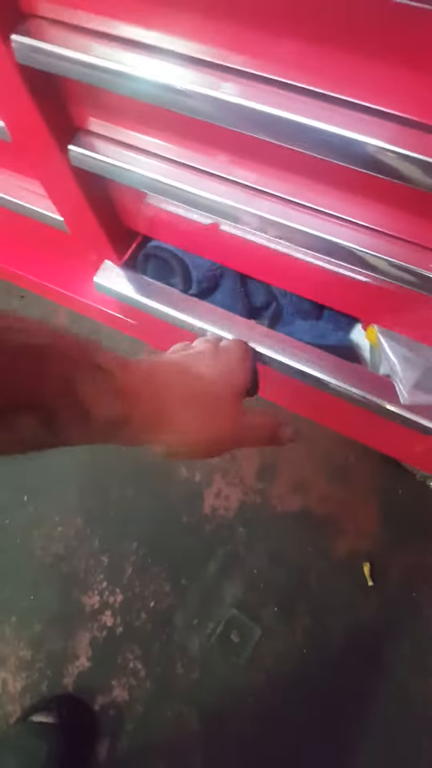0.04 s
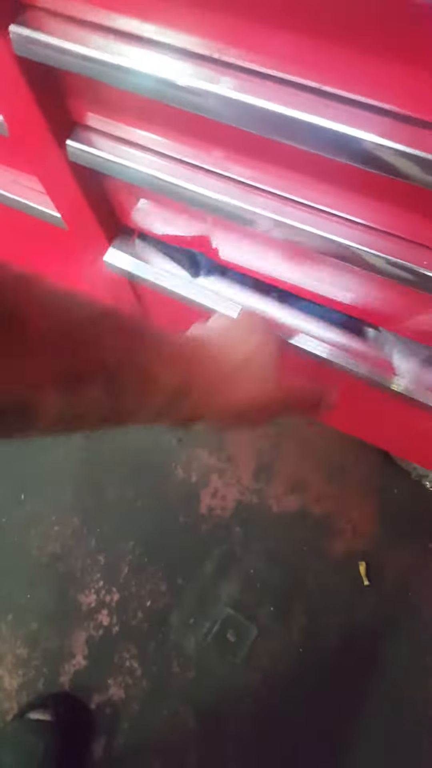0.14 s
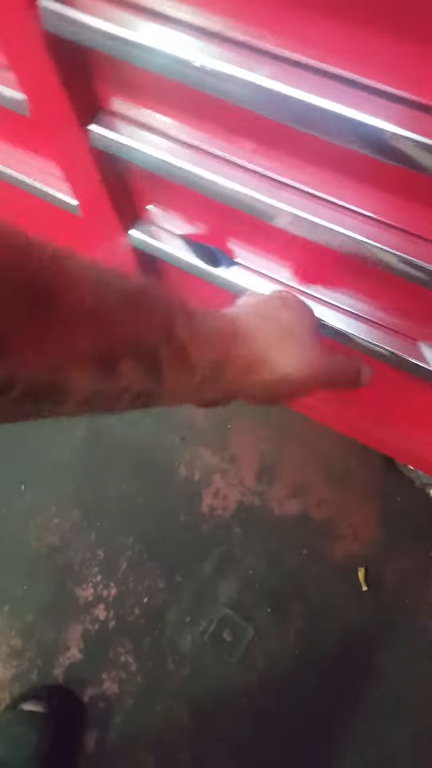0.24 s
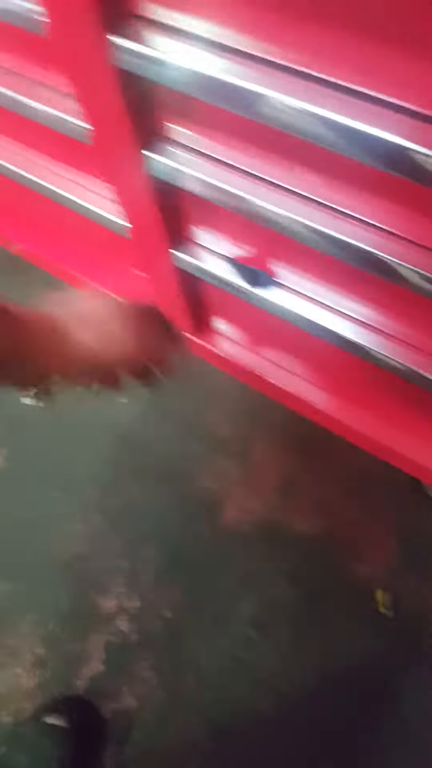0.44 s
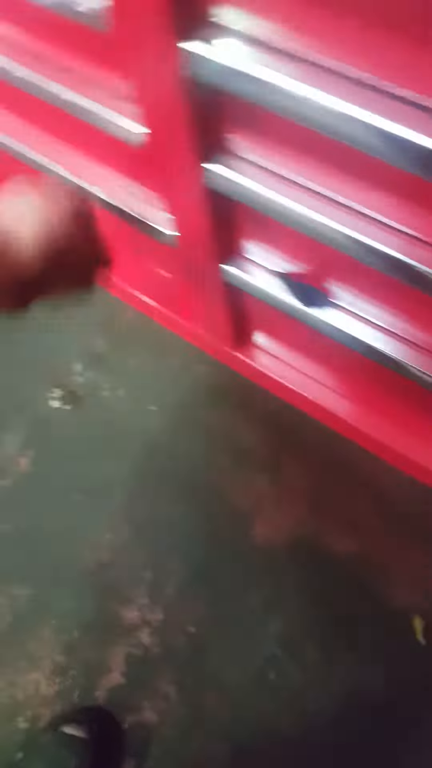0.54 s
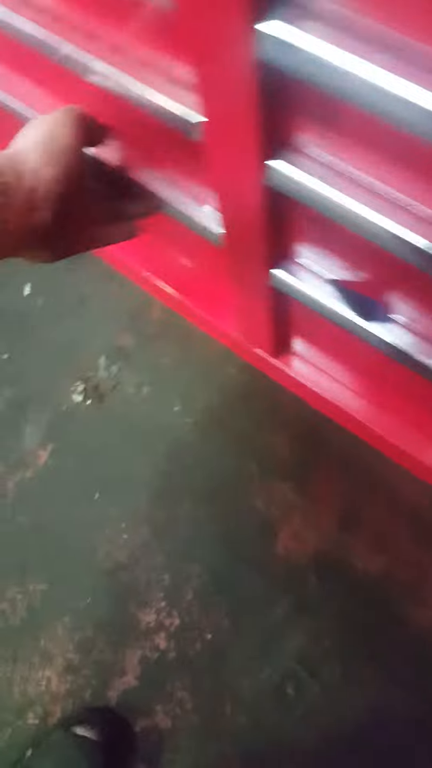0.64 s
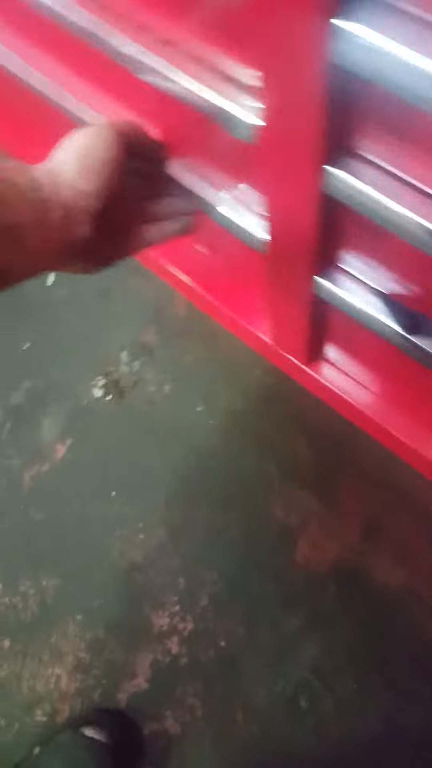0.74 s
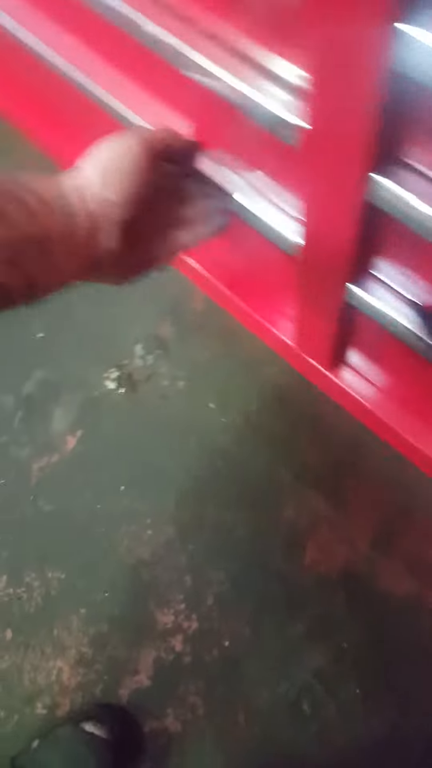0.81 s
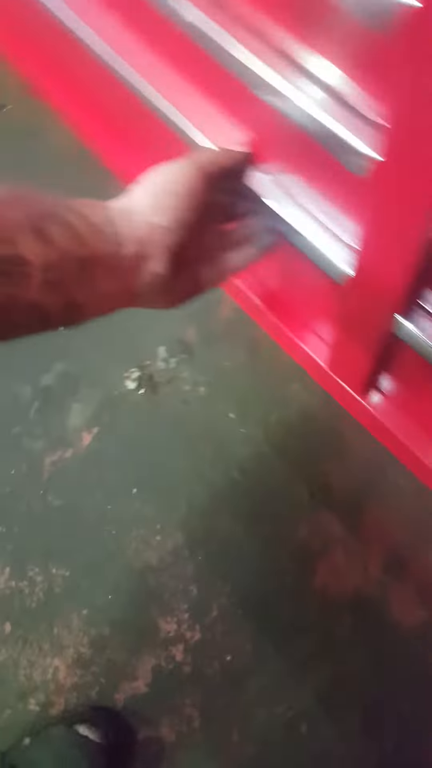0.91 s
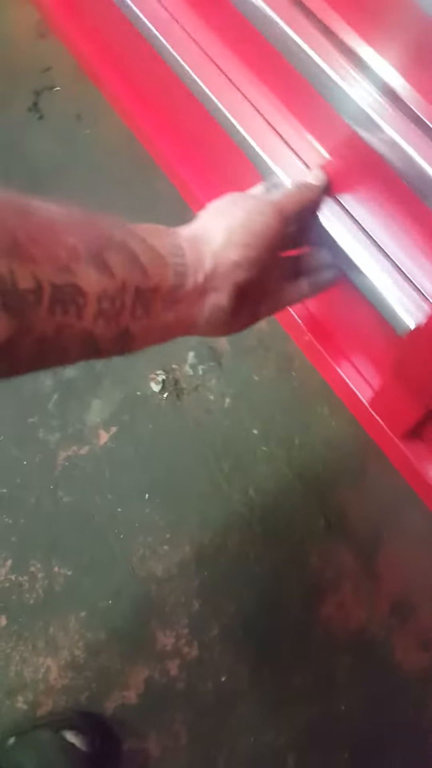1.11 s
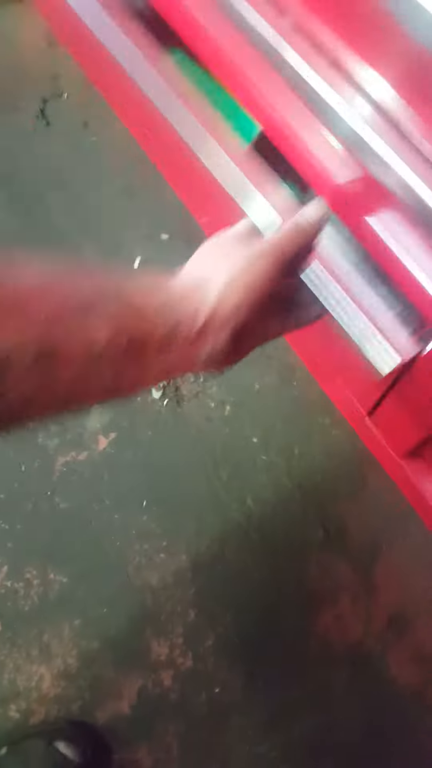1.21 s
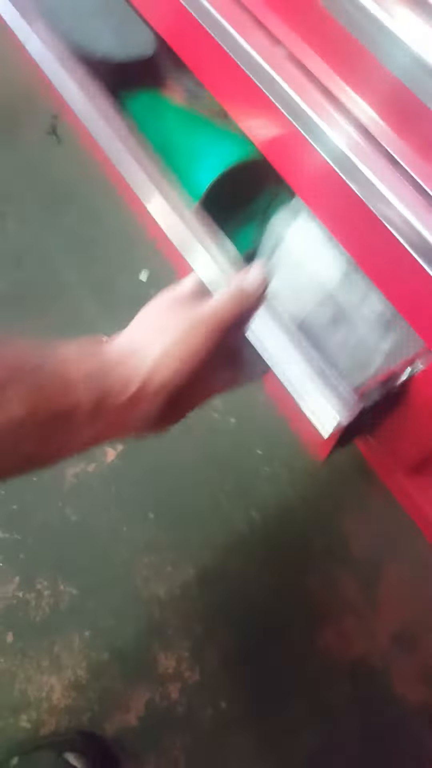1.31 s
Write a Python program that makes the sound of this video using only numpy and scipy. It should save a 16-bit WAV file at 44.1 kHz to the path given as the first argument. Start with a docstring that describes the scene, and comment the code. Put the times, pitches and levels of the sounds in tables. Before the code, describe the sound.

A steel tool-chest drawer slams shut with a boom, then another unlatches and rolls open

```python
"""Tool-chest drawer slammed in a garage

A hand shoves a steel drawer shut: it rolls, passes its catch and slams; the panels boom into the garage.
Then fingers grip the next handle, the drawer breaks free, rolls and clicks, over a low room hum.
Grains and knocks of force drive dense steel bursts and panel modes; ping, click and push are added sines.
Filtered noise makes echo and hum; two microphone ports hear the chest at different level and phase."""
import sys
import numpy as np
from scipy import signal
from scipy.fft import rfft, irfft
from scipy.io import wavfile
from scipy.ndimage import uniform_filter1d

SR = 44100
rng = np.random.default_rng(int(sys.argv[2]) if len(sys.argv) > 2 else 0)


def unload_wav(signal):
    """Save mono or channel-first audio to the path in sys.argv[1] as 16-bit WAV at rate SR, clipped to [-1, 1]."""
    wavfile.write(
        sys.argv[1],
        SR,
        np.round(np.clip(np.atleast_2d(signal).T, -1, 1) * 32767).astype(np.int16),
    )


def amplitude_ratio(level_db):
    """Convert a level in decibels to the matching linear amplitude (field) ratio."""
    exponent = np.asarray(level_db, float) / 20
    return 10 ** exponent


N = 59535
T = np.arange(N) / SR
OPPOSITE = np.array([[1], [-1]])  # signs of the side signal at left and right


def table(rows, hz):
    """Read (frequency [Hz], value) points on a log-frequency axis."""
    rows = np.array(rows, float)
    return np.interp(np.log(np.maximum(hz, 1)), np.log(np.maximum(rows[:, 0], 1)), rows[:, 1])


def unit(x):
    """Scale to unit energy."""
    return x / np.sqrt(np.sum(x ** 2))


def fade(t60_s, t_s):
    """Exponential decay, 60 dB down after t60_s."""
    return np.exp(-np.log(1000) * t_s / t60_s)


def highpass(x, order, cutoff_hz):
    """Butterworth high-pass."""
    return signal.sosfilt(signal.butter(order, cutoff_hz, "high", fs=SR, output="sos"), x)


def ring(modes, size=16384):
    """Sum of decaying sines; modes: (frequency [Hz], level [dB], T60 [s])."""
    t = T[:size]
    return sum(amplitude_ratio(db) * np.sin(2 * np.pi * hz * t) * fade(t60_s, t) for hz, db, t60_s in modes)


def bands():
    """Half-octave-spaced bands of two noises: centre [Hz], mid, side."""
    hz = np.fft.rfftfreq(N, 1 / SR)
    spectra = rfft(rng.standard_normal((2, N)))
    for centre_hz in 22 * 2 ** np.arange(0, 10, 0.5):
        octaves = np.log2(np.maximum(hz, 1) / centre_hz)
        window = np.cos(np.pi * np.clip(octaves, -0.5, 0.5)) ** 2
        mid, side = irfft(spectra * window, N)
        yield centre_hz, mid, side


def pair(hz, mid, side):
    """Mix left and right so that they correlate as a diffuse room field does."""
    # (frequency [Hz], left-right correlation)
    likeness = [(60, 0.94), (250, 0.97), (700, 0.37), (1500, 0.08), (12000, 0.026)]
    c = np.clip(table(likeness, hz), 0, 1)
    return np.sqrt(1 + c) * mid + np.sqrt(1 - c) * side * OPPOSITE


def rolling():
    """Rolling and rubbing on the runners: sparse random bearing grains into body, boom, clang and tick."""
    # each: (time [s], body level [dB], boom, clang, tick [dB re body])
    shut = [(0.0, -48, -3, -6, -16), (0.042, -51, 8, -31, -40), (0.072, -53, -1, -6.5, -16.5),
            (0.19, -36.5, 2.5, -12.5, -20.5), (0.2, -49.5, 7, 13, -6), (0.226, -8.5, -21, -11.5, -25.5),
            (0.256, -19, 11, -8.5, -37), (0.31, -32, 10.5, -34, -54)]
    grip = [(0.64, -77, 1, -11, -23), (0.7, -61, 9, 6.5, -13), (0.764, -53.5, -4, -24, -24),
            (0.858, -64, 12.5, 1, -12), (0.895, -52.5, -11, -3.5, -29), (0.926, -37.5, 4.5, -5, -46),
            (0.963, -45.5, -11.5, -43, -22), (0.996, -48.5, 15, -36, -44), (1.08, -67, 15, -23, -25)]
    pull = [(1.09, -59, 0, -33, -34), (1.116, -57, 3, -7, -27), (1.163, -46, 1, -11.5, -13.5),
            (1.201, -30.5, 5, -4.5, -35), (1.241, -35, 0, -4.5, -26), (1.264, -36.5, 5.5, -17, -42),
            (1.296, -46, 2, -4, -19), (1.305, -38.5, 8, -1.5, -24), (1.318, -39, -5, -31, -47),
            (1.35, -46.5, 11.5, 5, -39)]
    grains_per_s, mean_grain_boost_db = 6000, 2
    grains = rng.standard_normal((4, N)) * amplitude_ratio(mean_grain_boost_db * rng.exponential(size=N))
    grains *= rng.random(N) < grains_per_s / SR
    grains /= grains.std()
    force = np.zeros((4, N))
    for rows in (shut, grip, pull):
        time_s, body_db, *relative_db = np.array(rows).T
        level_db = np.interp(T, time_s, body_db, -150, -150)  # silent outside the phase
        offset_db = np.array([0 * T] + [np.interp(T, time_s, column) for column in relative_db])
        force += grains * amplitude_ratio(level_db + offset_db)
    return force


def dense(colour, decay_s, size=2048):
    """Sheet-steel modes merged into a decaying noise burst, repeatedly restored to an even colour."""
    gain = amplitude_ratio(table(colour, np.fft.rfftfreq(size, 1 / SR)))
    burst = rng.standard_normal(size)
    for _ in range(6):
        phase = np.angle(rfft(burst * fade(decay_s, T[:size])))
        burst = irfft(gain * np.exp(1j * phase), size)
    return unit(burst * fade(2 * decay_s, T[:size]))


def steelwork(body, clang, tick):
    """Body, bracket and small-part forces ring fresh dense bursts."""
    # dense-mode spectra of body, brackets, small parts: (frequency [Hz], relative level [dB per Hz])
    body_colour = [(150, -43), (300, -6.5), (750, -0.5), (990, -8), (1320, -5.5), (2000, -14),
                   (2600, -28.5), (4400, -48)]
    clang_colour = [(1100, -10), (1800, -4.5), (3000, -7), (3600, -15.5), (4600, -18.5), (6000, -27),
                    (7500, -34.5)]
    tick_colour = [(3000, -25), (6000, -2), (7500, -1.5), (10300, 4.5), (12800, 3.5), (16200, -18)]
    parts = ((body, body_colour, 0.053), (clang, clang_colour, 0.026), (tick, tick_colour, 0.017))  # decay_s
    return sum(signal.fftconvolve(force, dense(colour, decay_s))[:N] for force, colour, decay_s in parts)


def panels(boom):
    """The boom force rings the low modes of the panels."""
    # panel modes before the high-pass: (frequency [Hz], relative level [dB], T60 [s])
    modes = [(82, -42, 0.082), (104.9, -2, 0.22), (145, 2.5, 0.066), (171, -14.5, 0.12), (215, -14.5, 0.17),
             (256.6, 4.5, 0.0414), (310.7, -0.5, 0.036), (365, 0, 0.053), (495, -11.5, 0.12)]
    response = unit(highpass(ring(modes), 3, 84))
    return signal.fftconvolve(boom, response)[:N]


def garage(x):
    """Diffuse echo: band noises build up and die at their own rates, the highest fastest."""
    # (frequency [Hz], T60 [s])
    room_t60 = [(60, 0.95), (300, 0.78), (1500, 0.81), (5000, 0.74), (12000, 0.37)]
    echo_db, build_s = -11.5, 0.0031
    h = sum(pair(hz, mid, side) * fade(table(room_t60, hz), T) for hz, mid, side in bands())
    h *= 1 - np.exp(-T / build_s)
    return amplitude_ratio(echo_db) * signal.fftconvolve(x[None], unit(h) * np.sqrt(2), axes=1)[:, :N]


def hum():
    """Low room noise whose bands waver independently in level."""
    # (frequency [Hz], relative level [dB per Hz])
    colour = [(20, -6), (40, 5), (102, -10), (163, -11), (205, 10.5), (278, -16), (600, -32.5), (900, -19),
              (1300, -24.5), (2340, -33), (4500, -41.5), (7500, -54), (11500, -48.5), (16200, -50)]
    rms_db, waver_db, hold = -40.5, 4, 3000  # hold in samples
    out = 0
    for hz, mid, side in bands():
        steps = np.repeat(rng.standard_normal(N // hold + 1), hold)[:N]
        waver = uniform_filter1d(steps, size=hold)
        out = out + amplitude_ratio(table(colour, hz) + waver_db * waver) * pair(hz, mid, side)
    return amplitude_ratio(rms_db) * out / out.std()


def hand_push():
    """Soft push of the hand on the drawer front: low sines under one smooth swell."""
    # (frequency [Hz], level before gain_db [dB])
    tones = [(156, 3.5), (345, -13.5), (610, -17.5)]
    start_s, length_s, gain_db = 0.0043, 0.024, -26.5
    swell = np.sin(np.pi * np.clip((T - start_s) / length_s, 0, 1)) ** 2
    return amplitude_ratio(gain_db) * swell * sum(amplitude_ratio(db) * np.sin(2 * np.pi * hz * T) for hz, db in tones)


def knocks():
    """Steel on steel: decaying random-sign chatter, but a smooth decaying push into the panels."""
    # (time [s], decay constant [s], body, boom, clang, tick energy [dB])
    hits = [(0.1844, 0.00056, -3.5, -41.5, -9, -49), (0.203, 0.017, -39, -6.5, 2, -9.5),
            (0.222, 0.0066, -20, 6, -14, -34), (0.228, 0.0052, 11, 0.5, 12.5, -0.5),
            (.245, 0.0016, 12, 6, -27, -38), (0.2605, .002, -4, -7, -7, -29),
            (0.2755, 0.00067, 2, -9.5, -34, -38), (0.803, 0.0092, -46, -49, -29, -46),
            (0.878, 0.0054, -20, -54, -27, -44), (0.8999, 0.00047, -15, -35, -28, -34),
            (0.901, 0.008, -21, -22.5, -12.5, -23.5), (0.984, 0.0071, -9, -19, -31, -42),
            (1.167, 0.0031, -17, -23, -17, -34.5), (1.192, 0.0008, -23, -15.5, -45, -50),
            (1.205, 0.009, -0.5, -28, -17, -41), (1.2097, 0.0008, -23, -15.5, -14, -48),
            (1.227, 0.0035, -11.5, -14, -10.5, -43), (1.303, 0.03, -18, -29, -9, -46)]
    chatter = np.sign(rng.standard_normal(N))
    force = np.zeros((4, N))
    for start_s, decay_s, *energy_db in hits:
        shape = (T >= start_s) * np.exp(-np.maximum(T - start_s, 0) / decay_s)
        pulses = np.array([unit(shape * texture) for texture in (chatter, 1, chatter, chatter)])
        force += amplitude_ratio(np.array(energy_db))[:, None] * pulses
    return force


def struck(start_s, gain_db, modes):
    """Modes ring from start_s, their onset softened by the contact."""
    contact_s = 0.0006
    start = int(start_s * SR)
    h = ring(modes)[:N - start]
    out = np.zeros(N)
    out[start:start + len(h)] = amplitude_ratio(gain_db) * h * (1 - np.exp(-T[:len(h)] / contact_s))
    return out


def ping():
    """A small hard part rings on after the slam: one high decaying mode."""
    return struck(0.229, -44, [(12270, 0, 0.36)])


def latch():
    """Click of the second drawer: a few short modes."""
    # (frequency [Hz], level before the gain [dB], T60 [s])
    modes = [(1200, 10, 0.015), (1600, -24, 0.033), (1976, 3.5, 0.03), (2144, 9, 0.017), (3260, -3, 0.032)]
    return struck(1.3032, -24.5, modes)


def chest():
    """All chest sound, plus the part of the steel ring that differs between the ports."""
    width_db = -11
    body, boom, clang, tick = rolling() + knocks()
    mid = steelwork(body, clang, tick) + panels(boom) + hand_push() + ping() + latch()
    return mid, amplitude_ratio(width_db) * steelwork(body, clang, tick)


def ports(x):
    """Direct sound reaches the left port first; each port has its own colour."""
    # (frequency [Hz], left minus right level [dB])
    difference = [(60, 0.5), (200, 3), (380, 2), (700, 2.5), (1290, -4), (2380, -6.5), (4400, -2),
                  (8120, 2), (15000, 7.5)]
    lag_s, knee_hz = 0.00021, 1115  # above the knee the phase difference stops growing
    hz = np.fft.rfftfreq(2 * N, 1 / SR)
    half = amplitude_ratio(table(difference, hz) / 2) * np.exp(1j * np.pi * np.minimum(hz, knee_hz) * lag_s)
    return irfft(rfft(x, 2 * N) * np.array([half, 1 / half]), 2 * N)[:, :N]


def scene():
    """Direct sound at both ports, wide steel ring, garage echo and hum."""
    mid, side = chest()
    return ports(mid) + side * OPPOSITE + garage(mid) + hum()


def top_cut(x):
    """Nothing passes above the cut-off."""
    return signal.sosfilt(signal.butter(12, 16320, fs=SR, output="sos"), x)


def record(dry):
    """The microphone trims both ends of the band; tanh rounds the peaks."""
    x = highpass(dry, 2, 55)
    x = signal.sosfilt(signal.butter(8, 15400, fs=SR, output="sos"), x)
    return top_cut(np.tanh(0.46 * x) / 0.67)


dry = scene()
out = record(dry)
unload_wav(out)
```